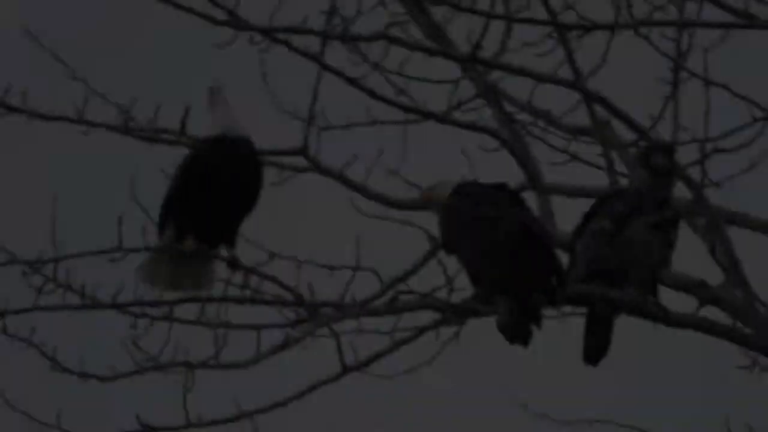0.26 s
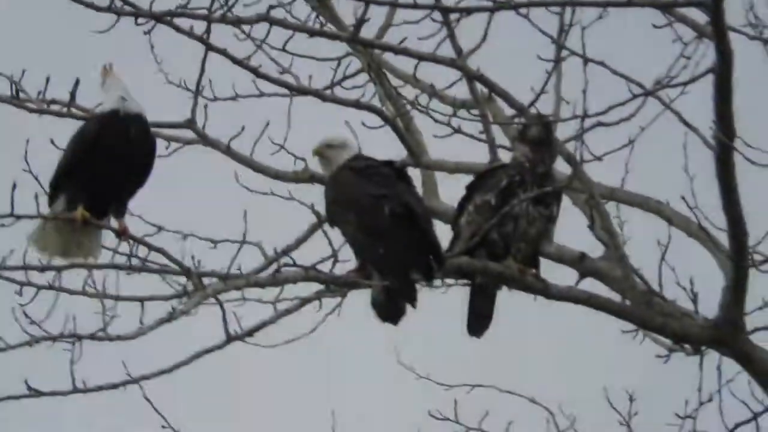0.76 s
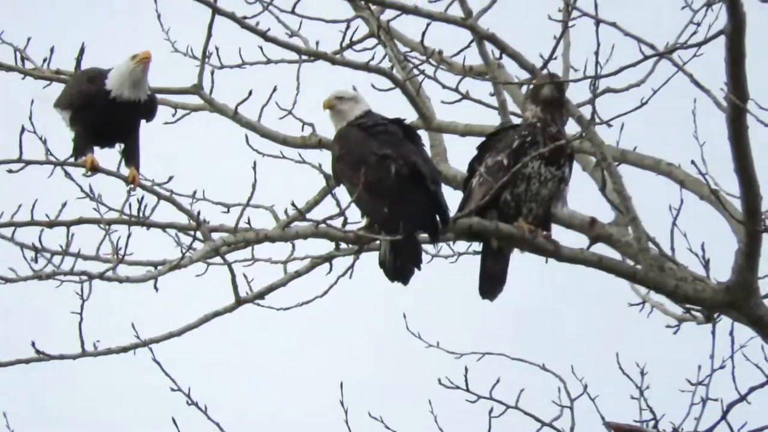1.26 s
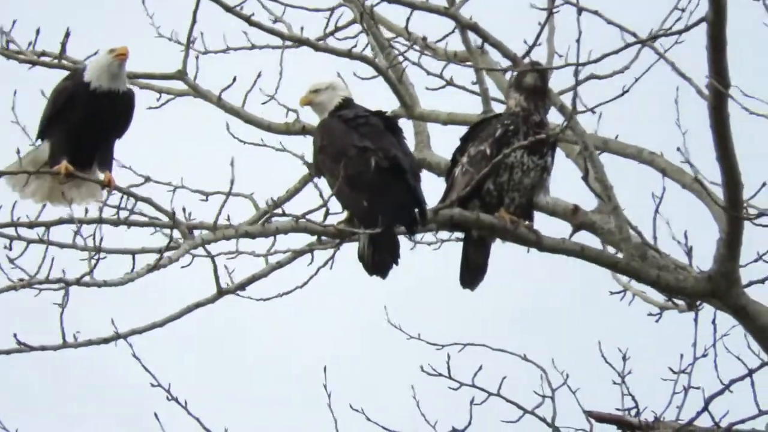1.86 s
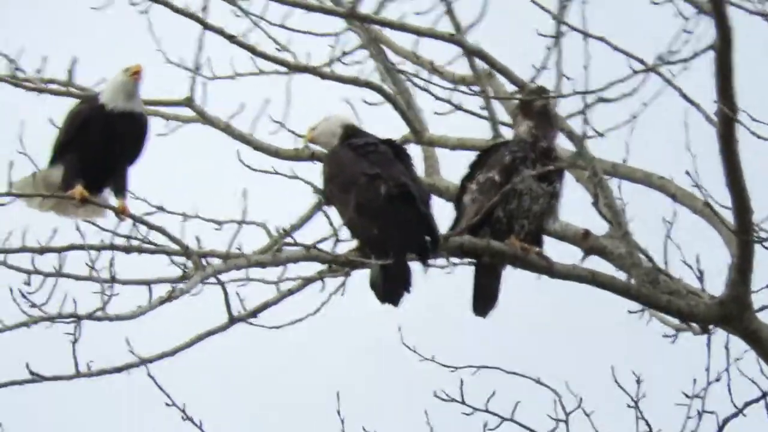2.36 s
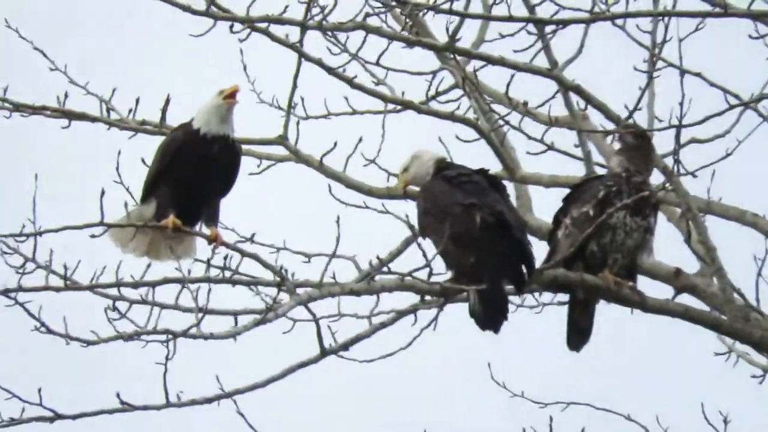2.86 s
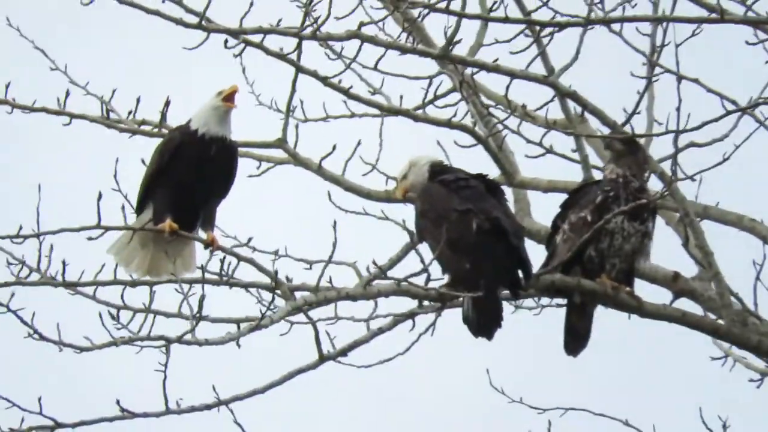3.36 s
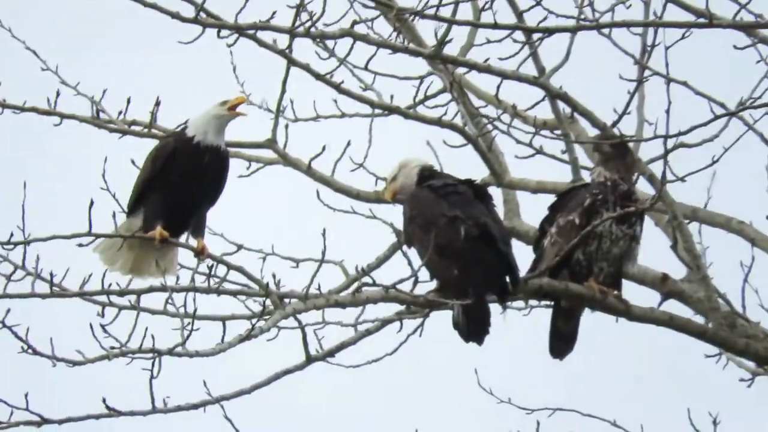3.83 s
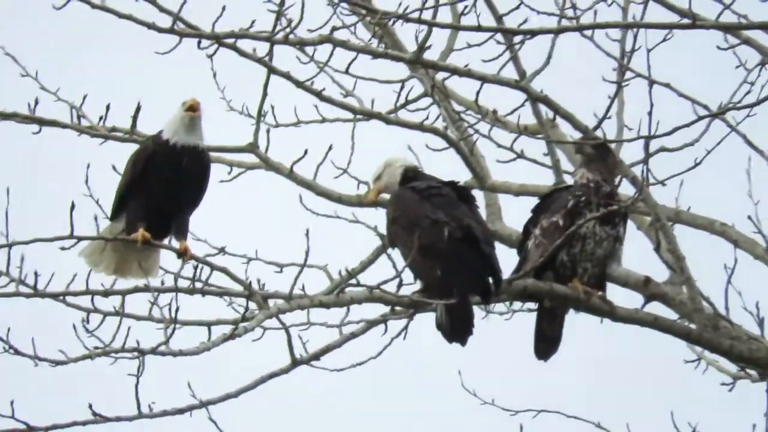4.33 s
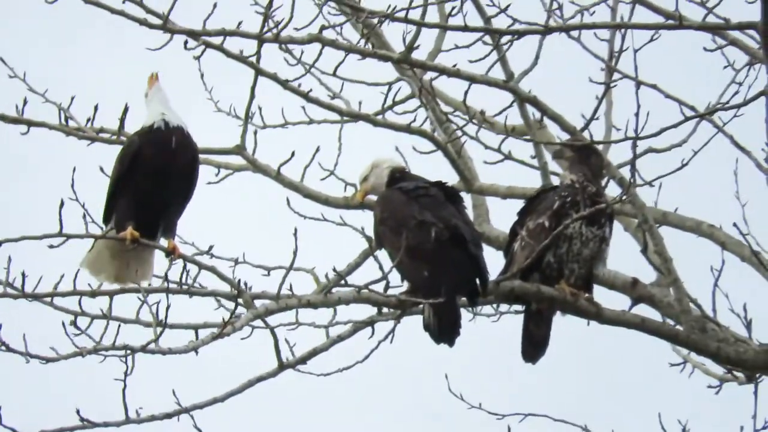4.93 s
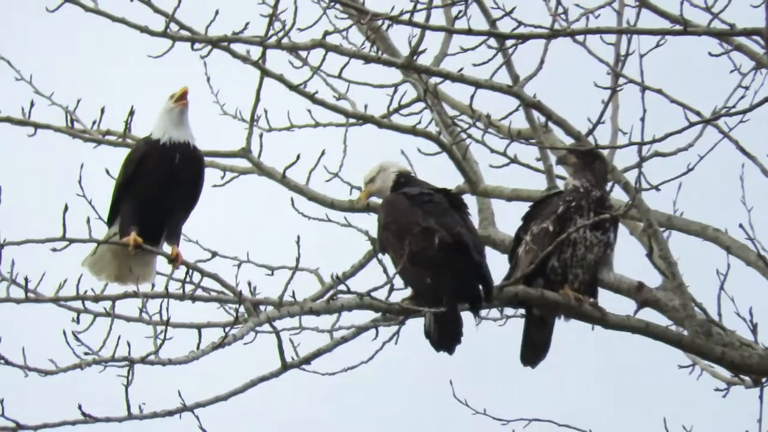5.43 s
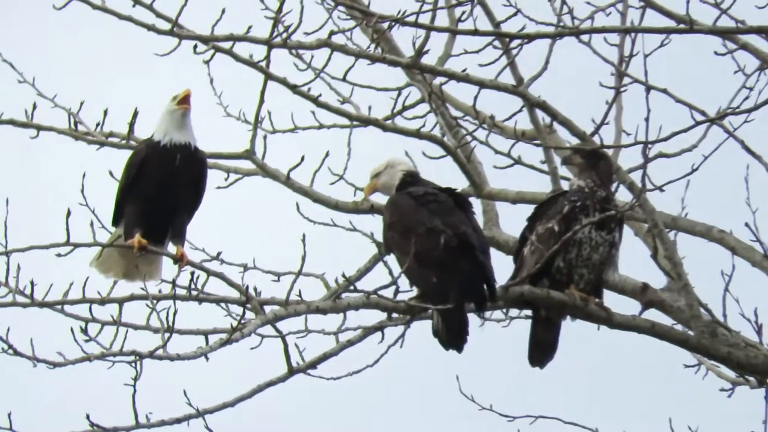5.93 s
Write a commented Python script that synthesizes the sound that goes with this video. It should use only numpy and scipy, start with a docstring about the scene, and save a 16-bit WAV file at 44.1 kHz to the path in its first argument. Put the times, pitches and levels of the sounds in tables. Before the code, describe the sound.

The sound starts in silence and fades in over the first second, revealing a steady, wide, low wash of distant traffic with a drifting deep engine hum and a faint mid whine, swelling gently throughout. From about 0.4 to 1.5 s a bald eagle gives faint, thin pips and hoarse squeaks, each yip slurring up and breaking into a higher whistle. Only traffic remains until a small low chirp near 3.3 s. At about 3.6 s the bird launches a loud, piercing, nearly pure whistle, wavering and leaping between registers, ending around 4.0 s in a quick yodel. Rapid short whistles tumble after it until 4.3 s. Then separate chatter notes come roughly four per second, pairing squeaky yips with low, raspy clucks; clearer squeaks occur at 5.0, 5.2 and 5.4 s, then weaker ones to about 6 s. Trunks and branches return short echoes and a light tail.

```python
"""Far traffic rumbles and hums as the sound fades in over the first second; then a bald eagle calls from a
bare tree: thin squeaks, one long piercing scream, then a chatter with raspy clucks.
The voice is a near-pure whistle that breaks between registers, with bursts of fluttering noise for its rasps;
trunks and branches scatter it back as echoes and a tail. The traffic is swelling coloured noise with two drones.
"""
import sys
import numpy as np
from scipy import signal
from scipy.fft import rfft, irfft, next_fast_len
from scipy.io import wavfile
from scipy.ndimage import uniform_filter1d

SR = 44100
rng = np.random.default_rng(int(sys.argv[2]) if len(sys.argv) > 2 else 0)


def transcribe(u):
    """Save the signal u as a 16-bit wav file named by the first command-line argument.

    u: samples, shape (n,) or (channels, n), limited to [-1, 1]; the rate is SR.
    q: integer samples, one column per channel.
    """
    v = np.clip(np.atleast_2d(u).T, -1, 1)
    q = np.round(v * 32767).astype(np.int16)
    wavfile.write(sys.argv[1], SR, q)


N = 272979
TIME = np.arange(N) / SR
# All levels in dB are set ahead of record(), whose fade-in ends at a gain of 0.71.


def amp(db):
    """Turns decibels into gain."""
    return 10 ** (np.asarray(db) / 20)


def unit(x):
    """Scales a signal to rms 1."""
    return x / np.sqrt(np.mean(x ** 2) + 1e-20)


def add(mix, s, sound):
    """Mixes a sound in at time s, cut off at the end of the mix."""
    part = mix[round(s * SR):][:len(sound)]
    part += sound[:len(part)]


def band_noise(size, hz, width_hz):
    """Noise in one bell-shaped band; centred on 0 Hz it is a slow random waver."""
    span = next_fast_len(max(size, SR // 2))
    f = np.fft.rfftfreq(span, 1 / SR)
    bell = (1 + ((f - hz) / (0.78 * width_hz)) ** 2) ** -1.5
    spectrum = rfft(rng.standard_normal(span)) * bell
    return unit(irfft(spectrum, span))[:size]


def drone(hz, level_db, wander, waver_db=0.5):
    """An engine tone whose pitch (wander: rms fraction) and strength drift on the way."""
    pitch = hz * (1 + wander * band_noise(N, 0, 4.02))
    tone = np.sin(2 * np.pi * np.cumsum(pitch) / SR)
    strength = amp(waver_db * band_noise(N, 0, 4.7))
    return amp(level_db) * unit(tone * strength)


def wash(spectrum, patchy_db=1.0):
    """Coloured noise with drifting patches; its bass and its middle swell with the traffic."""
    # Swell of the traffic, followed in part and only as departures from the mean.
    # Each row: time in seconds, rumble in dB, roar in dB.
    swell = [(1.0, -45.5, -51.5), (1.57, -51.5, -48.5), (1.62, -42.5, -49), (1.66, -48, -51),
             (1.92, -47.5, -49), (2.16, -47.5, -49.5), (3.12, -44.5, -50), (3.48, -50, -50.5),
             (3.51, -38, -49), (3.58, -45, -50), (4.36, -49.5, -49), (4.6, -44.5, -49), (4.8, -54, -48),
             (4.94, -40, -47), (4.97, -48, -49), (5.86, -48.5, -49), (6.02, -47.5, -49.5),
             (6.15, -53.5, -48.5)]
    frame, hop = 2048, 512  # samples
    frames, hz = N // hop + 5, np.fft.rfftfreq(frame, 1 / SR)
    t = np.arange(frames) * hop / SR
    real, imag, patches = rng.standard_normal((3, frames, len(hz)))

    s, rumble_db, roar_db = np.transpose(swell)
    rumble = np.interp(t, s, rumble_db - rumble_db.mean())[:, None]
    roar = np.interp(t, s, roar_db - roar_db.mean())[:, None]
    bass = 1 / (1 + (hz / 190) ** 4)
    middle = 1 / (1 + (hz / 1500) ** 2)

    f, db = np.transpose(spectrum)
    field_db = np.interp(np.log(hz + 1), np.log(f + 1), db)
    field_db = field_db + 0.51 * bass * rumble + 0.76 * (1 - bass) * middle * roar
    # smoothed over 8 frames and 14 frequency bins
    patches = uniform_filter1d(uniform_filter1d(patches, size=8, axis=0), size=14, axis=1)
    field_db += patchy_db * unit(patches)
    field = (real + 1j * imag) * amp(field_db)
    _, noise = signal.istft(field.T, nperseg=frame, noverlap=frame - hop)
    return unit(noise[:N])


def traffic():
    """Far road noise, wide above the bass, with a low hum and a faint whine of engines in the middle."""
    # Distant traffic and air, common to both ears.
    # Each row: frequency in Hz, relative density in dB per Hz.
    common = [(15, -30), (27, -10.5), (50, -4.5), (80, -5.5), (125, -4), (180, -9), (380, -12),
              (530, -14.5), (830, -12), (1150, -21), (2000, -32.5), (5000, -41.5), (10500, -51.5),
              (14000, -59.5)]
    # The part that sets the two ears apart. Each row: frequency in Hz, relative density in dB per Hz.
    wide = [(20, -37.5), (45, -30), (90, -12.5), (170, -1.5), (300, 0.5), (450, -1), (540, -6.5), (800, -9),
            (1500, -16.5), (3000, -24), (6000, -31.5), (10000, -39.5), (13500, -45.5)]
    # A far engine's low hum. Each row: time in seconds, level in dB.
    hum = [(0.8, -58), (1.22, -57), (1.39, -46.5), (1.5, -62), (1.92, -44), (2.47, -54), (2.77, -44.5),
           (2.88, -49.5), (3.5, -46.5), (4.0, -58), (4.61, -41.5), (4.8, -59), (5.2, -53), (5.85, -58),
           (6.01, -42.5), (6.15, -57)]
    common_db, wide_db = -42.5, -46.5
    mid = amp(common_db) * wash(common)
    # the wavering tone is scaled to rms 1, then follows the hum's level curve
    mid += drone(71.2, np.interp(TIME, *np.transpose(hum)), wander=0.0266)
    mid += drone(429, -58, wander=0.00298, waver_db=2.0)  # the whine
    side = amp(wide_db) * wash(wide)
    return np.array([mid + side, mid - side])


def rasp(s, length, hz, width_hz, level_db, flutter_db=7.5, pipe_hz=440, pipe_echo=.35):
    """The voice breaks into fluttering noise, coloured by the evenly spaced resonances of the windpipe."""
    size = int(length * 1.5 * SR)  # room for the soft ends of the window
    grain = band_noise(size, hz, width_hz) * amp(flutter_db * band_noise(size, 0, 110))
    round_trip = np.exp(-2j * np.pi * np.fft.rfftfreq(size, 1 / SR) / pipe_hz)
    grain = irfft(rfft(grain) / (1 - pipe_echo * round_trip), size)
    return s - size / SR / 2, amp(level_db) * np.hanning(size) * unit(grain)


def cluck(s, hz, level_db, length=0.027, fall=0.099, rough=0.64):
    """A short, falling low note, rough with noise around its pitch."""
    u = np.linspace(-.5, .5, int(length * SR))
    pitch = hz * (1 - fall * u)
    tone = np.sqrt(2) * np.sin(2 * np.pi * np.cumsum(pitch) / SR)
    rough_tone = tone + rough * band_noise(len(u), hz, 830)
    return s - length / 2, amp(level_db) * np.cos(np.pi * u) ** 2 * rough_tone


def whistle(rows, gap_db=0, jitter=0.0039, weak_jitter=0.018, jitter_hz=380,
            shimmer_db=3.0, hoarse_db=-37, weak_hoarse_db=-16):
    """A wavering near-sine along rows of (s, Hz, dB); soft low notes are unsteady and hoarse."""
    # Faint overtones. Each row: multiple of the pitch, level in dB against the fundamental.
    overtones = [(2, -36), (3, -62.5)]
    s, hz, level_db = np.transpose(rows)
    t = np.arange(s[0], s[-1], 1 / SR)
    effort_db, pitch = np.interp(t, s, level_db), np.interp(t, s, hz)
    # with gap_db set, the voice cuts out as it leaps between low and middle register
    gap_hz, gap_width_hz = 3530, 140
    effort_db = effort_db + gap_db * np.exp(-((pitch - gap_hz) / gap_width_hz) ** 2)

    low_register = np.clip((4400 - pitch) / 1000, 0, 1)
    weak = low_register * np.clip((-40 - effort_db) / 20, 0, 1)
    pitch = pitch * (1 + (jitter + weak_jitter * weak) * band_noise(len(t), 0, jitter_hz))
    phase = 2 * np.pi * np.cumsum(pitch) / SR
    tone = np.sin(phase)
    for multiple, db in overtones:
        tone += amp(db) * np.sin(multiple * phase)
    # the low register is reedier, with a stronger octave
    tone += amp(-33) * low_register ** 2 * np.sin(2 * phase)

    hoarseness = amp(hoarse_db) + weak * amp(weak_hoarse_db)
    tone *= 1 + hoarseness * band_noise(len(t), 0, 700)
    level = amp(effort_db + shimmer_db * band_noise(len(t), 0, 150))
    return s[0], np.sqrt(2) * level * tone * signal.windows.tukey(len(t), .03)


def note(s, rise, fall, hz, glide, level_db, ends_db=-20.5, jitter=0.0047, curve=1.42,
         scoop_hz=130, scoop_s=0.0059):
    """A short whistle that scoops up to a straight glide, swells to its peak and dies away."""
    t = np.linspace(-rise, fall)
    from_peak = np.maximum(-t / rise, t / fall)
    pitch = hz + glide * t - scoop_hz * np.exp(-(t + rise) / scoop_s)
    swell_db = level_db + ends_db * from_peak ** curve
    return whistle(np.transpose([s + t, pitch, swell_db]), jitter=jitter)


def squeak(s, yip_hz, yip_db, delay, thin_hz, thin_db):
    """A yip slurs upward, breaks hoarsely and lands on a thin, slowly rising whistle."""
    yip = note(s, rise=0.017, fall=0.015, hz=yip_hz, glide=5300, level_db=yip_db)
    # the climb between registers
    slur = note(s + 0.024, rise=.018, fall=0.041, hz=yip_hz * 1.08, glide=9600, level_db=yip_db - 19)
    # hoarseness where the voice breaks
    hoarse_break = rasp(s + .016, length=.06, hz=3480, width_hz=710, level_db=-58)
    thin = note(s + delay, rise=0.0436, fall=0.033, hz=thin_hz, glide=2300, level_db=thin_db,
                ends_db=-13.5, jitter=0.0073)
    return [yip, slur, hoarse_break, thin]


def woods(x, tail_db, t60=0.91, echo_side=0.29, build=0.011):
    """Direct sound, echoes off near trunks on either side, and a tail scattered by many branches."""
    # Nearby trunks. Each row: delay in seconds, level in dB against the direct sound.
    trunks = [(.0065, -9.5), (.015, -15), (.026, -11), (.038, -16), (.058, -17.5), (.097, -17),
              (.126, -31.5)]
    t = TIME[:SR]
    hits = rng.standard_normal((2, SR))
    scatter = hits * (rng.random((2, SR)) < 2500 / SR)  # about 2500 reflections per second
    scatter *= amp(-60 * t / t60) * (1 - np.exp(-t / build))
    mid, side = amp(tail_db) * scatter / np.linalg.norm(scatter, axis=1, keepdims=True)
    side = side * .5
    mid[0] += 1  # the direct path
    for k, (s, db) in enumerate(trunks):
        mid[round(s * SR)] += amp(db)
        side[round(s * SR)] += amp(db) * echo_side * (-1) ** k  # left and right in turn
    paths = np.array([mid + side, mid - side])
    return signal.fftconvolve(x[None], paths, axes=1)[:, :N]


def eagle():
    """All whistles, rasps and clucks of the one bird, heard through the trees."""
    # The long scream leaps to the middle register and holds it.
    # Each row: time in seconds, pitch in Hz, level in dB.
    scream = [(3.622, 3200, -58), (3.628, 3122, -42.5), (3.64, 2996, -42), (3.647, 3096, -29),
              (3.656, 3270, -33.5), (3.66, 3780, -32.5), (3.673, 4040, -28.5), (3.728, 4050, -28.5),
              (3.741, 4230, -32), (3.80, 3970, -37.5), (3.82, 4157, -28), (3.842, 4120, -22),
              (3.857, 3840, -34.5), (3.88, 3920, -27), (3.915, 4000, -31.5), (3.931, 3850, -30.5),
              (3.938, 3500, -53)]
    # It ends in a yodel between the low and middle registers.
    # Each row: time in seconds, pitch in Hz, level in dB.
    yodel = [(3.932, 3180, -35), (3.945, 2933, -45.5), (3.958, 2964, -35), (3.969, 3192, -25.5),
             (3.979, 3790, -40.5), (4.004, 4000, -33), (4.011, 3765, -32), (4.016, 3085, -34),
             (4.037, 2820, -55)]
    # Two-part squeaks, a low yip that breaks up into a thin whistle. Each row: time of the yip's peak in
    # seconds, yip in Hz, yip in dB, whistle delay in seconds, whistle in Hz, whistle in dB.
    squeaks = [ (.646, 3480, -55, 0.066, 4510, -57), (0.871, 3520, -51.5, .055, 4530, -53),
               (1.124, 3530, -52, 0.058, 4580, -57.5), (1.407, 3600, -43, .064, 4690, -53),
               (4.983, 3186, -47.5, .072, 4560, -53), (5.229, 3525, -41.5, 0.054, 4595, -50.5),
               (5.437, 3706, -37.5, 0.051, 4630, -50), ]
    # Low clucks that close the chatter notes, each out of a throaty rasp. Each row: time of the middle in
    # seconds, pitch in Hz, level in dB, rasp centre in Hz, rasp level in dB.
    clucks = [ (4.266, 1724, -42.5, 1810, -49), (4.51, 1474, -51, 1750, -54),
              (4.78, 1740, -49, 1920, -52.5), (5.05, 1640, -46, 3050, -56.5),
              (5.264, 1730, -51, 3200, -55.5), (5.303, 1632, -47.5, 2200, -59),
              (5.488, 1663, -50, 3100, -57), (5.538, 1616, -45.5, 2180, -61), (5.769, 1640, -49, 2400, -62),
              (6.005, 1712, -45, 2380, -58.5), ]
    # Single pips and slides, and at 3.792 s the echo of the high pip before it. Each row: time of the peak
    # in seconds, rise in seconds, fall in seconds, pitch in Hz, glide in Hz per second, level in dB.
    pips = [ (.385, 0.013, .02, 4470, 0, -59), (.475, 0.016, 0.027, 5250, 0, -62),
            (1.15, 0.024, .03, 5200, -5000, -65), (3.26, 0.018, 0.035, 2732, 2501, -49),
            (3.286, 0.029, .018, 2740, -3000, -47.5), (3.547, 0.0064, 0.0073, 3670, 1, -52.5),
            (3.596, 0.013, .013, 3170, 8998, -48), (3.608, 0.026, .026, 4270, 2997, -55),
            (3.753, 0.01, 0.02, 4777, -500, -33.5), (3.792, 0.019, 0.029, 4780, -3.5, -46),
            (4.056, 0.014, 0.023, 2900, 16994, -38), (4.084, 0.028, 0.0086, 3084, 1997, -26.5),
            (4.126, .025, 0.018, 2960, -4, -42), (4.155, 0.022, 0.014, 3110, 3994, -53),
            (4.182, .008, 0.014, 2846, 12000, -42), (4.223, 0.053, .014, 2922, 304.5, -36),
            (4.414, .01, 0.0084, 3210, -14000, -42.5), (4.715, 0.0094, 0.0087, 3080, 502, -34.5),
            (4.968, .014, 0.011, 3350, 45001, -55), (4.993, .008, 0.015, 3490, 0, -49),
            (5.082, 0.023, 0.057, 5340, 500, -58), (5.214, 0.0085, 0.011, 3220, 35000, -49),
            (5.696, 0.013, 0.022, 3520, 45004, -56), (5.928, 0.015, 0.018, 3557, 60000, -58),
            (5.947, 0.0085, 0.0091, 3160, -20000, -57), ]
    # Hoarse scrapes of the voice. Each row: time of the middle in seconds, length in seconds (between
    # soft ends), centre in Hz, nominal width in Hz, level in dB.
    rasps = [ (0.378, 0.055, 4000, 1800, -53), (0.477, 0.062, 5360, 1300, -63),
             (0.498, 0.083, 2580, 1400, -60.5), (1.205, 0.068, 2700, 1400, -63),
             (1.495, .06, 2700, 1200, -64), (3.283, .04, 2400, 600, -55.5), (3.283, .083, 4400, 1490, -69),
             (4.199, 0.019, 5700, 1000, -56.5), (4.257, 0.027, 1390, 300, -46),
             (4.441, 0.026, 3080, 900, -61), (4.442, 0.026, 1370, 600, -50.5),
             (4.47, 0.069, 4720, 1800, -68), ]

    yips, voice = np.zeros((2, N))
    # the loud call is steadier than the short notes
    sounds = [whistle(call, gap_db=-19, jitter=.003, shimmer_db=2.5) for call in (scream, yodel)]
    for row in squeaks:
        yip, *rest = squeak(*row)
        add(yips, *yip)
        sounds += rest
    for s, hz, level_db, rasp_hz, rasp_db in clucks:
        sounds.append(rasp(s - .02, length=.088, hz=rasp_hz, width_hz=1960, level_db=rasp_db))
        sounds.append(cluck(s, hz, level_db))
    sounds += [note(*row) for row in pips]
    sounds += [rasp(*row) for row in rasps]
    for s, sound in sounds:
        add(voice, s, sound)
    # the short yips stay drier than the other notes
    return woods(yips, tail_db=-18) + woods(voice, tail_db=-12)


def scene():
    """The bird in the trees over the traffic."""
    return traffic() + eagle()


def record(dry):
    """A fade-in, then the band limit."""
    # The fade-in, held at its last gain. Each row: time in seconds, gain as a plain factor.
    fade = [(.095, 0), (.15, 0.044), (.3, 0.15), (.5, 0.34), (.75, 0.51), (1.0, 0.71)]
    faded = dry * np.interp(TIME, *np.transpose(fade))
    lowpass = signal.firwin(511, 14000, window=("kaiser", 9), fs=SR)  # edge in Hz
    return signal.oaconvolve(faded, lowpass[None], "same")


dry = scene()
out = record(dry)
transcribe(out)
```